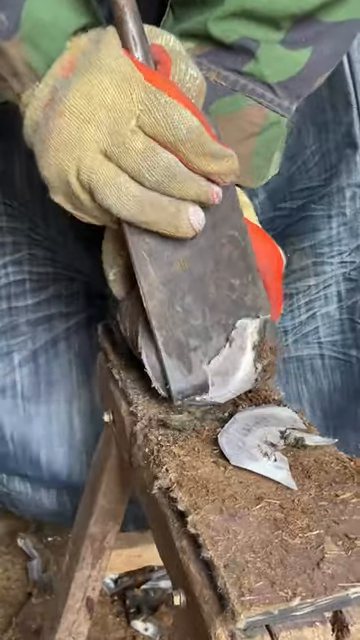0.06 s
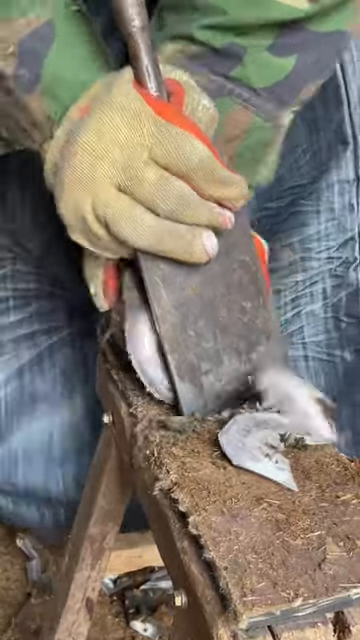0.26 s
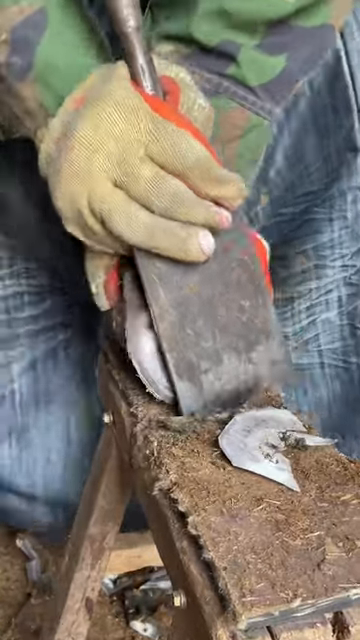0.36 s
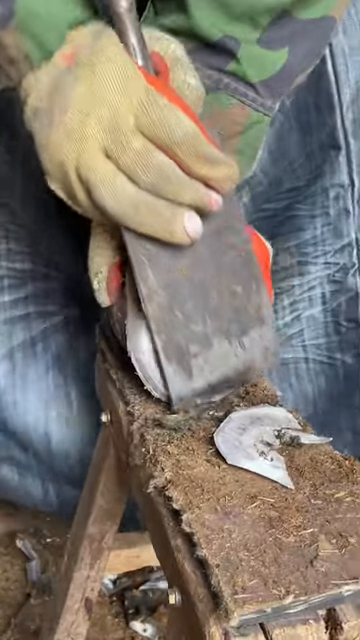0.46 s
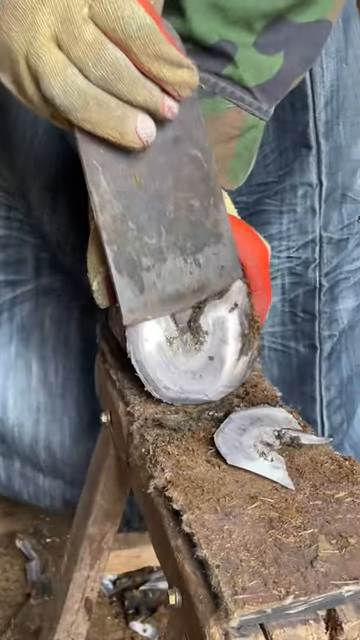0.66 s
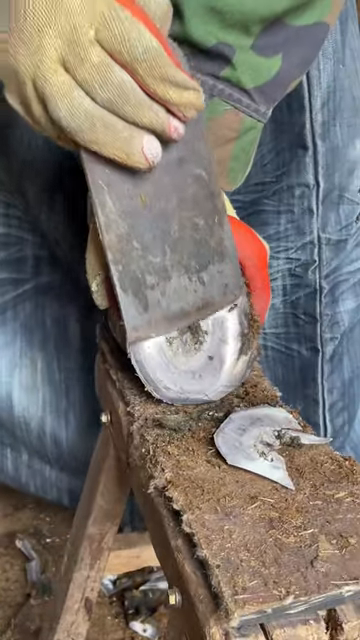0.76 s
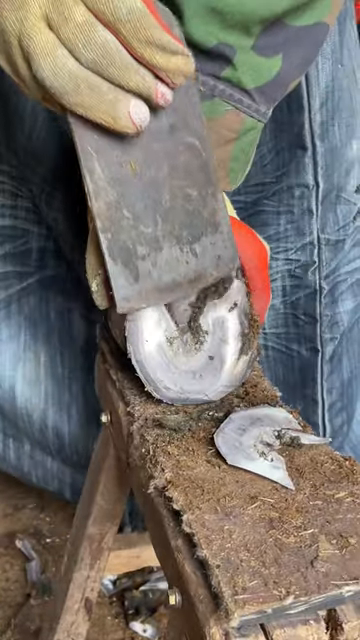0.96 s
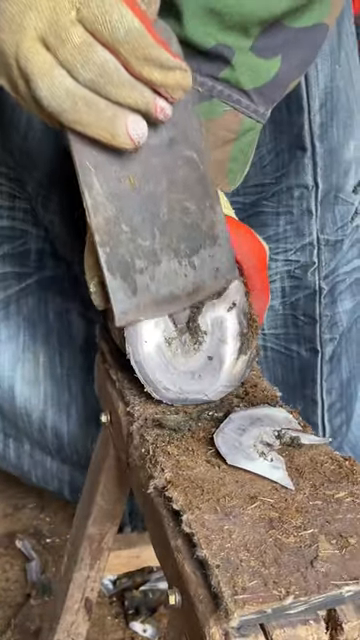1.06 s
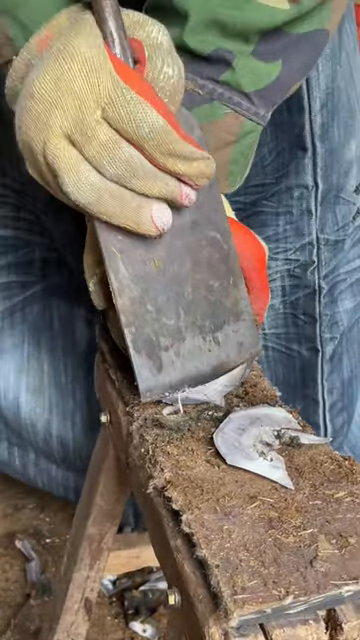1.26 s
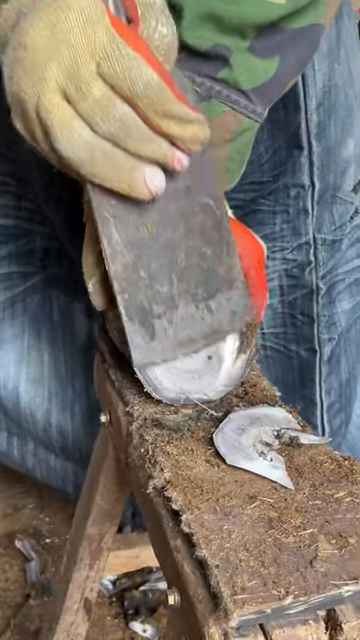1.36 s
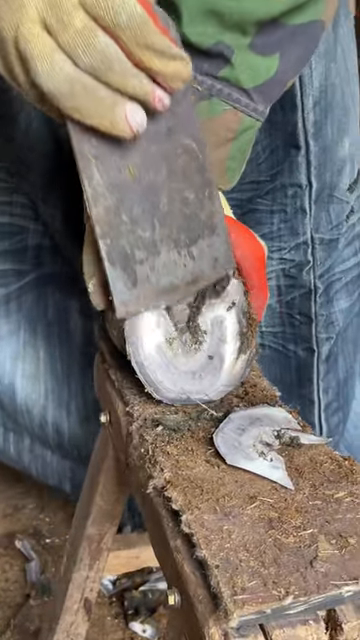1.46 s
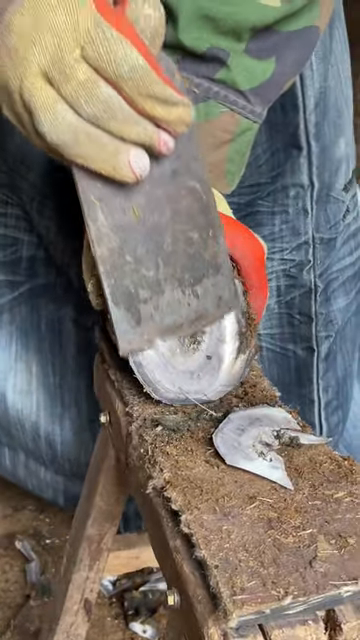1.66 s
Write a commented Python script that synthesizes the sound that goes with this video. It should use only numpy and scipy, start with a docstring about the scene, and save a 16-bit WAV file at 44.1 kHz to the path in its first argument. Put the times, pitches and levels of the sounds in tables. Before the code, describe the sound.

Hoof paring: a crisp crack and woody knock on a bench, followed by faint shaving scrapes.

```python
"""A broad steel blade pares a hoof on a wooden bench, close to two microphone ports.
The horn cracks and crunches (shaped noise), the slice snaps off (a noise burst, then damped modes) and
dull blows excite the bench (damped sines). The blade is drawn back with ticks and falling swishes, then
shaves on lightly: friction noise through its resonances, with narrow modes singing. Glove and sleeve rub,
the bench shudders at low frequency, a short room tail follows, and a low noise rumble lies beneath."""
import sys
import numpy as np
from scipy import signal
from scipy.fft import rfft, irfft, next_fast_len
from scipy.io import wavfile

SR = 44100
rng = np.random.default_rng(int(sys.argv[2]) if len(sys.argv) > 2 else 0)


def inscribe(sig):
    """Save sig as 16-bit PCM at rate SR to the path in sys.argv[1].

    A 1-D sig is mono; a 2-D sig holds one channel per row.
    Samples are clipped to [-1, 1] before scaling.
    """
    pcm = np.round(np.clip(np.atleast_2d(sig).T, -1, 1) * 32767)
    wavfile.write(sys.argv[1], SR, pcm.astype(np.int16))


N = 74970

# horn giving way ahead of the edge: [t/s, level/dB, t60/s, f/Hz of the slice's ring, ring level/dB]
HORN_CRACKS = [(0.1858, -41.5, 0.03, 1850, -46), (0.1982, -18, 0.012, 2330, -27.5),
               (.2062, -29.5, 0.018, 2145, -31.5), (0.2092, -25.5, 0.022, 1790, -31),
               (0.2269, -16.5, 0.016, 1703, -31.5)]
# spectrum of breaking horn: [f/Hz, relative level/dB]
HORN_SPECTRUM = [(100, -2), (700, 3), (1300, 0.5), (2200, 0), (3200, -6.5), (5000, -6.5), (8500, -3.5),
                 (10500, -6.5), (12000, -20), (13500, -34), (15500, -36)]
# resonances of the stressed slice, colouring the cracks: [f/Hz, width/Hz, relative level/dB]
SLICE_RESONANCES = [(2160, 330, 4), (3900, 580, 6.5), (5800, 350, -3), (8600, 1100, 8)]
SLICE_T60_S = 0.04
# horn crumbling under the edge: [t/s, half length/s, level/dB, centre f/Hz, width/octaves]
HORN_CRUNCHES = [(0.213, 0.0072, -42, 6200, .25), (0.218, .006, -41, 1200, 1),
                 (0.229, 0.0066, -47, 910, 0.35), (0.413, 0.018, -49, 4080, 0.56),
                 (.4425, .004, -40, 2400, 1), (0.454, .011, -43, 1630, 0.48),
                 (0.479, .012, -58, 11700, 0.089)]
CRUMBS_PER_S, CRUMB_T60_S = 570, 0.013

# spectrum of the tearing burst: [f/Hz, relative level/dB]
SNAP_SPECTRUM = [(200, 4.5), (700, -12), (1100, 3.5), (1270, -13), (1550, 7), (1900, 5), (2500, 1),
                 (3300, 1), (4000, -5), (5400, 5), (7400, -4.5), (10500, -5), (12500, -27), (15500, -36)]
# hoof and blade ringing at the snap: [f/Hz, relative level/dB]
SNAP_RESONANCES = [(729, -11), (908, -7), (1020, -4), (1140, -4), (1440, -5), (1510, 1), (1759, -1),
                   (2009, -6), (2152, -2), (2335, -4), (2627, -5), (3105, -7), (3375, -4), (3660, -10),
                   (4648, -6), (4913, -3), (5589, -4), (6141, -8), (7365, -5), (8400, -12), (9420, -11)]
SNAP_S, SNAP_DB, SNAP_T60_S, SNAP_ATTACK_S = 0.252, -14, 0.0083, 0.0018
SNAP_HOLD_S = 0.003  # the fracture runs through the slice
MODE_LAG_AT_1KHZ_S, MODE_RISE_CYCLES = 0.002036, 1.7  # lower modes start later
MODE_DB, MODE_T60_AT_1KHZ_S, MODE_DAMPING_POWER = -11, 0.032, 0.25  # higher modes die sooner

# dull blows on the bench: [t/s, level/dB, f/Hz, t60/s]
BENCH_BLOWS = [(0.2255, -16.5, 447, 0.024), (0.2252, -24, 262, 0.051), (.255, -9, 252, 0.043),
               (.257, -6, 461, 0.028), (.261, -23.5, 72.5, 0.093), (0.2615, -8, 122.6, 0.052),
               (0.5095, -19.5, 299, 0.04), (0.5204, -18, 280.5, 0.022)]
# bench modes ringing on from the snap: [f/Hz, level/dB, t60/s]
BENCH_MODES = [(212.5, -29.5, 0.14), (255, -28, 0.2)]
THUMP_RISE_S = 0.0018
# light contacts of the blade: [t/s, level/dB, t60/s, centre f/Hz, width/octaves]
BLADE_TICKS = [(.0085, -32.5, 0.015, 5060, 1), (.161, -31.5, 0.015, 6500, 0.71),
               (0.4318, -28.5, 0.014, 3760, 1), (0.4403, -36.5, 0.046, 1490, 1),
               (.4625, -40, 0.02, 6170, .6), (0.5192, -33, 0.014, 8800, 1), (0.5615, -44, 0.034, 6400, .6),
               (0.61, -33, 0.015, 4170, 1.05), (0.623, -45.5, 0.017, 8500, .6),
               (0.6767, -36.5, 0.014, 4800, 0.48), (0.746, -47, 0.03, 2620, 0.71),
               (1.315, -49, 0.033, 6700, .9), (1.529, -52, .025, 7500, .6)]

# friction while drawing back: [t/s, relative middle level/dB, relative treble level/dB]
DRAWING_BACK = [(0, -52.5, -66.5), (.18, -61.5, -69), (.2, -47.5, -51.5), (.245, -44, -45.5),
                (.29, -45.5, -62.5), (.36, -49, -66.5), (.425, -47, -65.5), (.44, -46, -63),
                (.47, -46.5, -58), (.55, -52.5, -61), (.65, -55, -72.5), (.74, -55, -64.5),
                (.78, -62.5, -75)]
# friction while shaving on: [t/s, relative middle level/dB, relative treble level/dB]
SHAVING_ON = [(0.8, -63.5, -81), (0.862, -56.5, -67), (0.894, -58, -77), (0.91, -56.5, -68.5),
              (1.065, -55.5, -70.5), (1.148, -53, -56.5), (1.258, -53.5, -66.5), (1.272, -62, -78),
              (1.306, -67.5, -73), (1.316, -61, -73), (1.404, -56.5, -62.5), (1.486, -59.5, -70.5),
              (1.509, -58, -59.5), (1.558, -60.5, -80.5), (1.576, -58, -64), (1.622, -60.5, -71.5),
              (1.634, -56, -62.5), (1.7, -50, -56)]
# middle spectrum while drawing back: [f/Hz, relative level/dB]
BACK_SPECTRUM = [(150, 6.5), (400, 2), (700, 5.5), (1200, -1.5), (1550, 3.5), (1900, -2.5), (3400, -2),
                 (4400, -9.5), (6000, -10), (10000, -46)]
# middle spectrum while shaving: [f/Hz, relative level/dB]
SHAVING_SPECTRUM = [(150, -4.5), (400, -1), (700, -7), (950, 0.5), (1220, -6), (1550, 3.5), (1900, -2),
                    (3400, -4.5), (4400, -9), (6000, -9), (10000, -41)]
# treble spectrum of both movements: [f/Hz, relative level/dB]
TREBLE_SPECTRUM = [(2000, -48), (4200, -3.5), (5500, -1), (7500, 4), (9200, 5), (10700, -12), (11800, -26),
                   (13000, -22), (15500, -52.5)]
# resonances of the flat steel: [f/Hz, width/Hz, relative level/dB]
STEEL_RESONANCES = [(1470, 95, -4.5), (2236, 60, 9), (3380, 29, 4.5), (4920, 220, 5), (5555, 87, 9.5),
                    (6200, 87, 5.5), (6600, 90, -1.5), (7320, 90, 5), (8230, 88, -9), (8490, 600, 2.5),
                    (10630, 170, 12)]
MIDDLE_GAIN_DB, TREBLE_GAIN_DB = 0.5, 7.5
GRAINS_PER_S = 6000

# steel singing where the edge bites: [t/s, half length/s, low, middle and high mode level/dB]
EDGE_BITES = [(0.753, 0.012, -86, -54, -83), (.972, .01, -57.5, -83, -83), (1.113, 0.011, -55, -57, -77),
              (1.166, 0.022, -57.5, -46.5, -73), (1.406, 0.017, -55.5, -56.5, -73),
              (1.516, 0.023, -75, -55, -54), (1.59, 0.015, -65, -61.5, -59),
              (1.685, 0.056, -57.5, -60.5, -84)]
# singing modes of the blade: [f/Hz, width relative to f]
SINGING_MODES = [(1490, 0.053), (2285, 0.016), (4814, 0.011)]
# sliding blade, falling in pitch: [t/s, length/s, first f/Hz, last f/Hz, relative level/dB]
BLADE_SWISHES = [(0.379, 0.095, 5250, 3000, -57.5), (1.314, .052, 7100, 5310, -57.5),
                 (1.343, 0.118, 4135, 3100, -58)]
SWISH_GAIN_DB, SWISH_RELATIVE_WIDTH = 6.5, 0.13
SWISH_CATCHES_PER_S, SWISH_CATCH_T60_S = 900, 0.04

# glove and sleeve rubbing as the arm moves: [t/s, half length/s, level/dB]
CLOTH_RUBS = [(0.377, 0.05, -45.5), (0.916, 0.014, -49.5), (1.222, 0.02, -48), (1.444, 0.018, -47)]
# spectrum of the rubbing: [f/Hz, relative level/dB]
CLOTH_SPECTRUM = [(80, 0), (170, 5.5), (300, 0), (450, -16.5), (900, -63)]
# bench shuddering as the weight on it shifts: [t/s, half length/s, f/Hz, level/dB]
BENCH_SHUDDERS = [(0.047, 0.02, 66, -34), (0.42, .035, 65, -42), (.922, 0.016, 63, -35),
                  (1.01, 0.033, 62, -39.5), (1.247, 0.016, 60, -32.5), (1.41, 0.043, 66, -38)]

# decay of the room: [f/Hz, t60/s]
ROOM_DECAY = [(100, 0.29), (500, 0.17), (2500, 0.12), (7000, 0.092), (12000, 0.18)]
ROOM_DB = -13.5
# gain of the part that differs between the ports, in room and rumble: [f/Hz, gain/dB]
DIFFUSE_GAIN = [(30, -15), (200, -13.5), (700, 2.5), (1500, -0.5), (3000, -33), (12000, -17)]
# spectrum of the rumble: [f/Hz, relative level/dB]
RUMBLE_SPECTRUM = [(12, -67.5), (20, -63), (41, -3.5), (66, 1), (129, -7), (211, -13), (334, -25.5),
                   (456, -25.5), (503, -37), (564, -32.5), (1000, -37.5), (1300, -34.5), (2200, -120)]
# course of the rumble: [t/s, level/dB]
RUMBLE_COURSE = [(0, -42.5), (.05, -41.5), (.17, -44), (.3, -47.5), (.45, -40.5), (.62, -40.5), (.72, -45),
                 (.87, -47), (.91, -45.5), (1.1, -42), (1.25, -42), (1.28, -42.5), (1.44, -43),
                 (1.49, -45.5), (1.6, -44), (1.7, -43)]
# phase by which the left port leads: [f/Hz, phase/rad]
PORT_LEAD = [(20, 0), (500, 0), (750, .8), (950, 0), (1350, -.4), (1650, 0), (2300, .45), (4000, .65),
             (4650, 1.7), (5200, 5), (5700, 6.1), (6300, 6.5), (8700, 9.3), (9600, 9.7), (11800, 12.1),
             (13000, 12.9), (15500, 15)]
# left minus right port: [f/Hz, level difference/dB]
PORT_DIFFERENCE = [(50, -1.2), (160, -2), (450, -6), (740, -4.5), (1200, 0), (2000, 0), (12000, 0.94)]
LOW_CUT_HZ, TOP_HZ = 32, 15750


def amp(db):
    """Logarithmic level: decibels to amplitude ratio."""
    return 10 ** (np.asarray(db) / 20)


def unit(x):
    """Normalisation: scale to rms 1."""
    return x / np.sqrt(np.mean(x ** 2) + 1e-20)


def along(points, hz):
    """Interpolation of (f, value) points on a logarithmic frequency axis."""
    f, v = np.transpose(points)
    return np.interp(np.log(hz + 1), np.log(f + 1), v)


def curves(rows):
    """Linear interpolation in time: one value per sample for each column after the time."""
    s, *cols = np.transpose(rows)
    return [np.interp(np.arange(N) / SR, s, c) for c in cols]


def filtered(x, response):
    """Linear filtering: the spectrum of x times a complex frequency response."""
    m = next_fast_len(N + SR // 2)
    return irfft(rfft(x, m) * response(np.fft.rfftfreq(m, 1 / SR)), m)[..., :N]


def noise(spectrum):
    """Spectral shaping of white noise, to rms 1."""
    return unit(filtered(rng.standard_normal(N), lambda f: amp(along(spectrum, f))))


def since(s):
    """Time elapsed after s in seconds, zero before."""
    return np.maximum(np.arange(N) / SR - s, 0)


def strike(s, rise, t60):
    """Impact envelope: exponential approach from s, then exponential decay."""
    t = since(s)
    return (1 - np.exp(-t / rise)) * np.exp(-np.log(1000) * t / t60)


def ring(s, hz, rise, t60):
    """Free vibration of one damped mode."""
    return np.sin(2 * np.pi * hz * since(s)) * strike(s, rise, t60)


def resonant(modes, f):
    """Resonance: the gain of a flat response with power peaks added to it."""
    peaks = sum(amp(db) ** 2 / (1 + (2 * (f - hz) / width) ** 2) for hz, width, db in modes)
    return np.sqrt(1 + peaks)


def swell(s, half):
    """Gaussian modulation: a soft bump of level centred on s."""
    return np.exp(-((since(0) - s) / half) ** 2)


def stutter(rate, t60):
    """Shot process: random slips of random size, each dying away; an envelope of rms 1."""
    sizes = amp(3 * rng.standard_normal(N))  # spread of 3 dB
    slips = (rng.random(N) < rate / SR) * sizes
    power_decay = np.exp(-2 * np.log(1000) / (t60 * SR))
    return unit(np.sqrt(signal.lfilter([1], [1, -power_decay], slips ** 2)))


def horn_noise(centre_hz, octaves):
    """Band limitation: one band of the noise of breaking horn, rms 1."""
    def band(f):
        return np.exp(-0.5 * (np.log2((f + 1) / centre_hz) / octaves) ** 2)
    return unit(filtered(noise(HORN_SPECTRUM), band))


def cracks():
    """Brittle fracture: bursts ahead of the edge ring the slice, lower from the second crack on."""
    horn = unit(filtered(noise(HORN_SPECTRUM), lambda f: resonant(SLICE_RESONANCES, f)))
    out = np.zeros(N)
    for s, db, t60, hz, ring_db in HORN_CRACKS:
        out += amp(db) * horn * strike(s, 0.00052, t60)
        out += amp(ring_db) * ring(s, hz, 0.00054, SLICE_T60_S)
    return out


def crunches():
    """Granular fracture: crumbs of horn break in quick, uneven runs under the edge."""
    bands = sum(amp(db) * swell(s, half) * horn_noise(hz, octaves)
                for s, half, db, hz, octaves in HORN_CRUNCHES)
    return stutter(CRUMBS_PER_S, CRUMB_T60_S) * bands


def snap():
    """Sudden release: a tearing burst, then modes of hoof and blade ring, the high ones first."""
    rise = np.exp(np.minimum(since(0) - SNAP_S, 0) / SNAP_ATTACK_S)
    release = np.exp(-np.log(1000) * since(SNAP_S + SNAP_HOLD_S) / SNAP_T60_S)
    out = amp(SNAP_DB) * noise(SNAP_SPECTRUM) * rise * release
    for hz, db in SNAP_RESONANCES:
        khz = hz / 1000
        start = SNAP_S + MODE_LAG_AT_1KHZ_S / khz
        t60 = MODE_T60_AT_1KHZ_S / khz ** MODE_DAMPING_POWER
        out += amp(MODE_DB + db) * ring(start, hz, MODE_RISE_CYCLES / hz, t60)
    return out


def thumps():
    """Impact excitation: blade and hoof knock on the bench, whose modes ring on from the snap."""
    blows = sum(amp(db) * ring(s, hz, THUMP_RISE_S, t60) for s, db, hz, t60 in BENCH_BLOWS)
    return blows + sum(amp(db) * ring(SNAP_S, hz, THUMP_RISE_S, t60) for hz, db, t60 in BENCH_MODES)


def ticks():
    """Brief contact: the edge touches the horn lightly, giving short bands of noise."""
    return sum(amp(db) * horn_noise(hz, octaves) * strike(s, 0.00033, t60)
               for s, db, t60, hz, octaves in BLADE_TICKS)


def friction(spectrum):
    """Sliding friction: steady hiss and equally strong tiny slips ring the flat steel, rms 1."""
    slips = (rng.random(N) < GRAINS_PER_S / SR) * rng.standard_normal(N)
    force = rng.standard_normal(N) + unit(slips)
    return unit(filtered(force, lambda f: amp(along(spectrum, f)) * resonant(STEEL_RESONANCES, f)))


def scrape():
    """Friction in two strokes: the edge slides back over the sole, then shaves forward."""
    middle_db, treble_db = curves(np.vstack([DRAWING_BACK, SHAVING_ON]))
    shaving = since(DRAWING_BACK[-1][0]) > 0
    middle = np.where(shaving, friction(SHAVING_SPECTRUM), friction(BACK_SPECTRUM))
    treble = friction(TREBLE_SPECTRUM)
    return amp(middle_db + MIDDLE_GAIN_DB) * middle + amp(treble_db + TREBLE_GAIN_DB) * treble


def singing():
    """Frictional excitation of resonance: noise swells in three narrow modes of the blade."""
    modes = np.array([
        unit(filtered(rng.standard_normal(N), lambda f: 1 / (1 + ((f / hz - 1) / width) ** 2)))
        for hz, width in SINGING_MODES])
    return sum(swell(s, half) * (amp(levels_db) @ modes) for s, half, *levels_db in EDGE_BITES)


def swishes():
    """Gliding noise band: low noise modulates a falling tone, a broken hiss as the blade slows."""
    out = np.zeros(N)
    for s, length, from_hz, to_hz, db in BLADE_SWISHES:
        progress = np.minimum(since(s) / length, 1)
        width_hz = SWISH_RELATIVE_WIDTH * from_hz
        band = unit(filtered(rng.standard_normal(N), lambda f: np.exp(-(f / width_hz) ** 2)))
        pitch_hz = from_hz * (to_hz / from_hz) ** progress
        carrier = np.sin(2 * np.pi * np.cumsum(pitch_hz) / SR)
        out += amp(db + SWISH_GAIN_DB) * np.sin(np.pi * progress) * band * carrier
    return out * stutter(SWISH_CATCHES_PER_S, SWISH_CATCH_T60_S)


def cloth():
    """Soft friction: glove and sleeve rub as dull noise."""
    return noise(CLOTH_SPECTRUM) * sum(amp(db) * swell(s, half) for s, half, db in CLOTH_RUBS)


def shudders():
    """Low-order vibration: soft, deep swells of the bench's lowest mode, at random phase."""
    return sum(amp(db) * swell(s, half) * np.sin(2 * np.pi * (hz * since(0) + rng.random()))
               for s, half, hz, db in BENCH_SHUDDERS)


def room(x):
    """Reverberation: convolution with a short noise tail whose decay depends on frequency."""
    hz, t, z = signal.stft(rng.standard_normal((2, SR // 2)), SR, nperseg=256)
    decay = np.exp(-np.log(1000) * t / along(ROOM_DECAY, hz)[:, None])
    tail = signal.istft(z * decay, SR, nperseg=256)[1]
    mid, side = signal.fftconvolve(x[None], tail / np.linalg.norm(tail[0]), axes=1)[:, :N]
    side = filtered(side, lambda f: amp(along(DIFFUSE_GAIN, f)))
    return np.array([mid + side, mid - side])


def rumble():
    """Partly coherent noise: an uneven low rumble, slightly different at each port."""
    level_db, = curves(RUMBLE_COURSE)
    side = filtered(noise(RUMBLE_SPECTRUM), lambda f: amp(along(DIFFUSE_GAIN, f)))
    return amp(level_db) * (noise(RUMBLE_SPECTRUM) + np.array([side, -side]))


def scene():
    """Superposition at two ports, with phase and level differences; the bass leans right."""
    work = cracks() + crunches() + snap() + thumps() + ticks() + scrape()
    work = work + singing() + swishes() + cloth() + shudders()
    half = np.array([[0.5], [-0.5]])  # each port takes half of the difference

    def ports(f):
        gain = amp(half * along(PORT_DIFFERENCE, f))
        return gain * np.exp(1j * half * along(PORT_LEAD, f))
    return filtered(work + amp(ROOM_DB) * room(work) + rumble(), ports)


def record(dry):
    """Band limitation: the recorder drops the deepest bass and all above its upper limit."""
    return filtered(dry, lambda f: (f < TOP_HZ) * (1 - np.exp(-(f / LOW_CUT_HZ) ** 2)))


dry = scene()
out = record(dry)
inscribe(out)
```